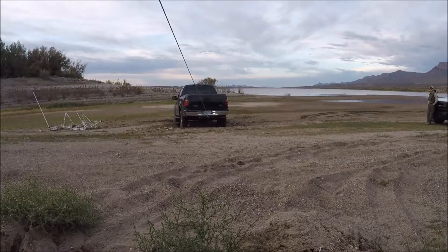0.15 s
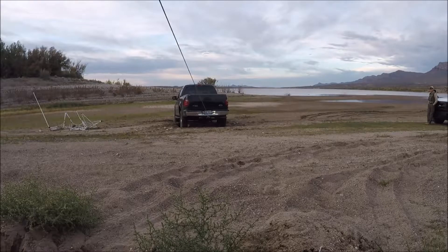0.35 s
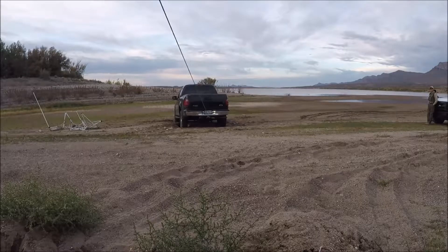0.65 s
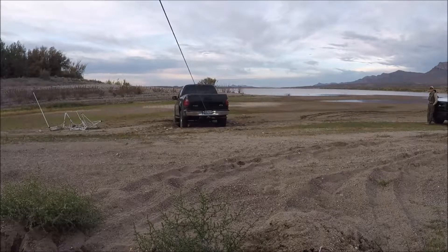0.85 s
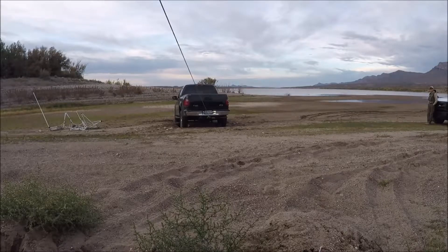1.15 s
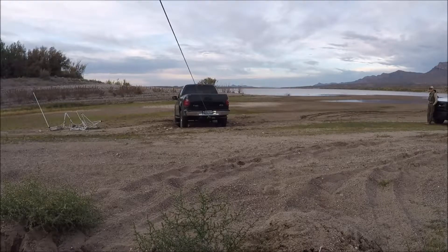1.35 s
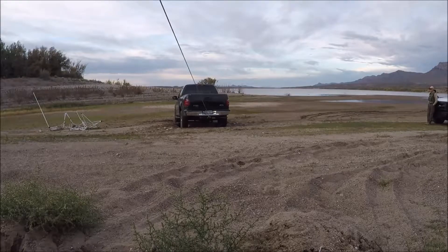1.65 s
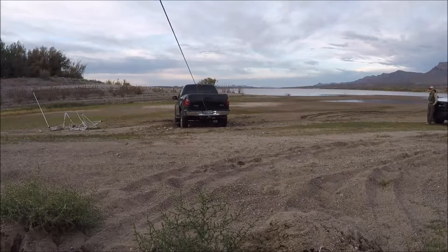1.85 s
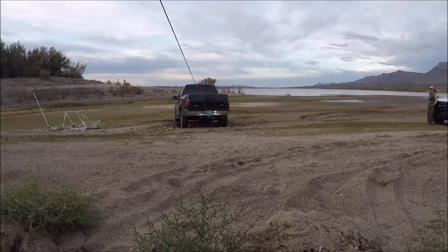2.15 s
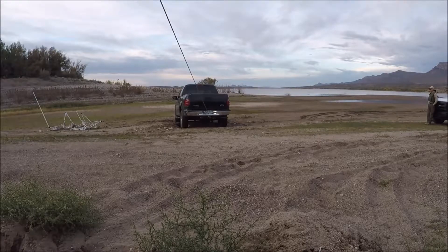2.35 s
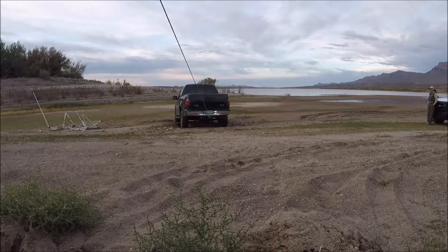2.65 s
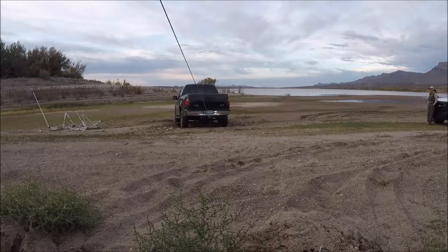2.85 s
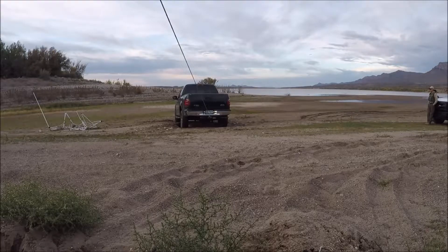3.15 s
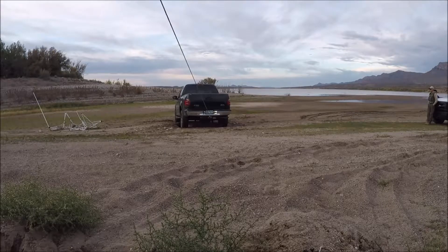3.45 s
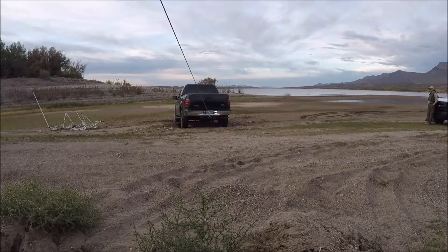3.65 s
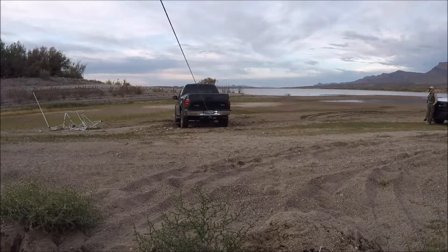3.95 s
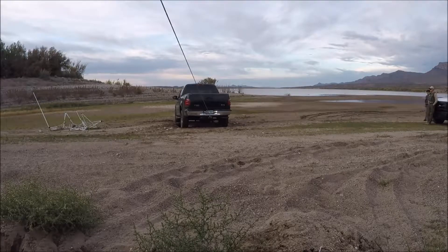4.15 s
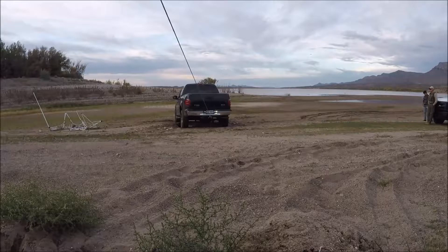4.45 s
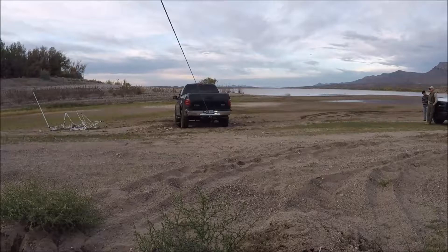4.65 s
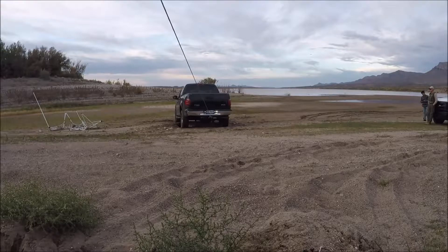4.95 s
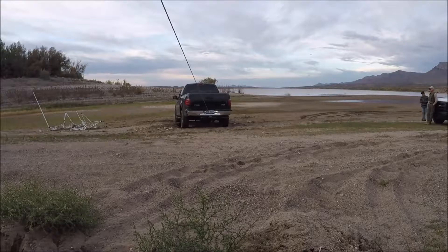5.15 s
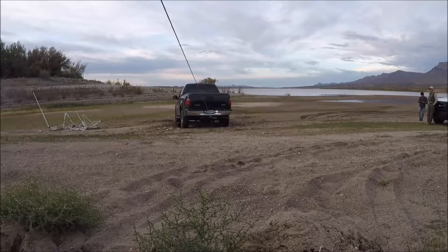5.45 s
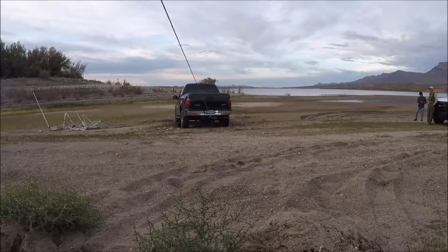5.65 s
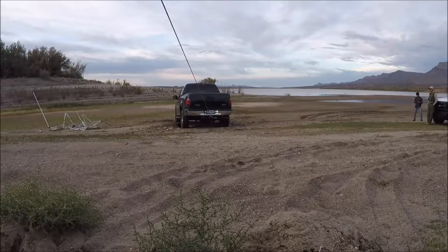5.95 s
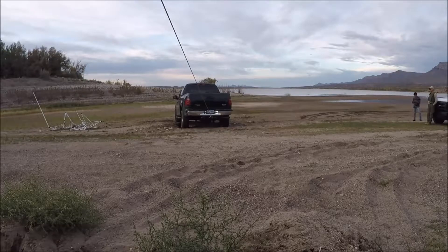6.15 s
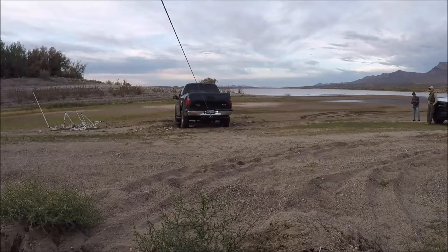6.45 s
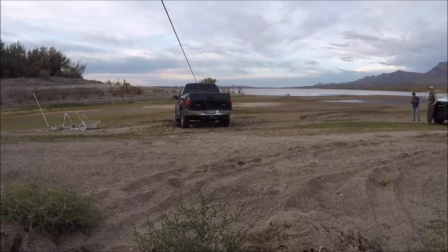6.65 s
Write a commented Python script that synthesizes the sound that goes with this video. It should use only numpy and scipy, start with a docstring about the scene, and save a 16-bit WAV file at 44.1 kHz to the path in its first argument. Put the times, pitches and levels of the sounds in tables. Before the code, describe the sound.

A hydraulic winch whines steadily at one nearly fixed pitch over a burbling truck engine, with cable ticks thinning out and a few dull drum knocks.

```python
"""A hydraulic winch whines as it hauls a stuck pickup over sand, with the towing truck's engine at a fast idle.
The engine burbles and drives a pump; the pump turns the winch motor, whose lobes whine and rasp on each turn.
The whine grows louder whenever the speed sags. Oil and air hiss, exhaust gas rumbles and a low drone wavers.
The loaded cable ticks, ever more rarely, as it settles on the drum, and a few dull knocks come from the drum."""
import sys
import numpy as np
from scipy import signal
from scipy.fft import rfft, irfft, next_fast_len
from scipy.io import wavfile
from scipy.ndimage import map_coordinates

SR = 44100
rng = np.random.default_rng(int(sys.argv[2]) if len(sys.argv) > 2 else 0)


def master_out(mix):
    """Clip the mix to full scale and print it as 16-bit PCM to the path in sys.argv[1]."""
    frames = np.transpose(np.atleast_2d(mix))
    ceiling = np.clip(frames, -1, 1)
    pcm = np.round(ceiling * 32767).astype(np.int16)
    wavfile.write(sys.argv[1], SR, pcm)


N = 300753
LOBE_PULSES_PER_TURN = 42
TURNS_PER_REV = .3341  # turns of the winch motor per engine revolution


def amp(db):
    """Turn decibels into a gain."""
    return 10 ** (np.asarray(db) / 20)


def unit(x):
    """Scale to an rms of 1."""
    return x / np.sqrt(np.mean(x ** 2) + 1e-20)


def along(points, hz):
    """Read (frequency, value) points on a logarithmic frequency axis."""
    f, v = np.transpose(points)
    return np.interp(np.log(hz + 1), np.log(f + 1), v)


def curve(rows):
    """Join (time, value) points by straight lines, one value per sample."""
    times, values = np.transpose(rows)
    return np.interp(np.arange(N) / SR, times, values)


def swell(rows):
    """A gain that follows a level curve in dB about its own mean."""
    db = curve(rows)
    return amp(db - db.mean())


def wobble(rate):
    """A smooth random curve with this many random knots a second."""
    knots = rng.standard_normal(int(N * rate / SR) + 4)
    return map_coordinates(knots, [np.arange(N) * rate / SR])


def ripples(hz, spacing_hz, knots):
    """A smooth random curve over frequency, with a knot every spacing_hz."""
    return map_coordinates(knots, [hz / spacing_hz], mode="mirror")


def filtered(x, gain):
    """Give x a gain that depends on frequency; zero padding leaves room for the filter to ring."""
    size = next_fast_len(len(x) + 8192)
    spectrum = rfft(x, size) * gain(np.fft.rfftfreq(size, 1 / SR))
    return irfft(spectrum, size)[:len(x)]


def noise(density_db):
    """Noise whose level per Hz is a function of frequency."""
    return filtered(rng.standard_normal(N), lambda hz: amp(density_db(hz)) * np.sqrt(SR / 2))


def cyclic(turn, orders, dispersion=None, size=16384):
    """A wave that repeats once a turn, from (multiple, dB rms) rows; a dispersive pipe delays the higher ones."""
    k, db = np.transpose(orders)
    if dispersion is None:
        phase = 2 * np.pi * rng.random(len(k))
    else:
        phase = -dispersion * k ** 2
    lines = np.zeros(size // 2 + 1, complex)
    lines[np.round(k).astype(int)] = amp(db) * np.exp(1j * phase)
    one_turn = irfft(lines) * size / np.sqrt(2)
    return np.interp(turn * size, np.arange(size), one_turn, period=size)


# Pitch of the whine, which tells the engine speed: (time [s], pitch [Hz])
SPEED = [(0.0, 719.6), (0.15, 718.7), (0.4, 721.0), (0.6, 720.9), (1.8, 725.6), (2.45, 723.3),
         (2.75, 719.6), (3.02, 720.7), (3.45, 724.5), (4.3, 724.7), (4.8, 722.6), (5.5, 722.5),
         (5.95, 721.1), (6.82, 723.7)]


def whine_pitch():
    """The engine drives the winch through the pump, so the pitch of the whine follows the engine speed."""
    return curve(SPEED)


# Clean lines of the winch motor: (multiple of the shaft turn, level [dB])
MOTOR_LINES = [(7, -32), (36, -34.0), (40, -45), (42, -26.4), (48, -43.2), (77, -45), (78, -30.1),
               (79, -46), (80, -46), (81, -40.5), (82, -34.9), (83, -38.2), (85, -43.5), (86, -44.9),
               (90, -36.3), (92, -46), (102, -45.3), (108, -43.9), (112, -48.4), (113, -45.0), (114, -45.2),
               (126, -36), (128, -43.9), (132, -39.5), (138, -48.4), (162, -45), (205, -46)]
# How the shaft hurries and lags within a turn: (multiple of the turn, relative level [dB])
SWAY = [(1, 0), (2, -8), (6, -20)]


def whine(turn, whine_hz, usual_db=-20, fall_db_per_hz=.7):
    """Six lobes in seven pockets give 42 pressure pulses a turn; their octave rings out, flanked by sidebands."""
    shaft = turn + .00013 * wobble(45)
    octave = np.sqrt(2) * np.sin(2 * np.pi * 2 * LOBE_PULSES_PER_TURN * shaft)
    # a lower pitch than usual means a louder whine
    level_db = usual_db - fall_db_per_hz * (whine_hz - whine_hz.mean())
    # the sidebands swell and sink within each turn
    beads = unit(amp(1.5 * unit(cyclic(turn, SWAY)) + .8 * wobble(20)))
    sidebands = beads * cyclic(shaft, MOTOR_LINES)
    return octave * amp(level_db + 0.12 * wobble(40)) + sidebands


# Fluttering overtones: (multiple of the lobe pulse rate, level before the shared swell [dB])
OVERTONES = [(4, -38.8), (5, -37.2), (6, -42.2), (7, -44.9), (8, -48.5), (9, -49.0), (10, -49.6),
             (11, -57.4), (12, -54.8), (13, -57.4)]
# Beating of the overtones: (multiple of the turn, relative level [dB])
THROB = [(1, -6), (2, 0), (3, -7), (5, -6), (6, 0), (7, -6), (8, -8)]


def overtones(turn, sway_rad=0.37, jitter_rad=0.033, beat_depth=.52, flicker=.2):
    """The shaft turns unevenly, so the higher overtones warble and beat in a pattern that slowly shifts."""
    lobe_phase = 2 * np.pi * LOBE_PULSES_PER_TURN * turn
    out = np.zeros(N)
    for k, db in OVERTONES:
        lag = sway_rad * unit(cyclic(turn, SWAY)) + jitter_rad * wobble(70)
        throb = unit(cyclic(turn + .03 * wobble(0.99), THROB))
        beat = 1 + beat_depth * throb + flicker * wobble(40)
        out += amp(db) * unit(beat * np.sin(round(k) * (lobe_phase + lag)))
    return out


# Tone colour of the rubbing: (frequency [Hz], level per Hz before the trim [dB])
RASP = [(400, -67.5), (600, -77), (850, -75), (1000, -62), (1250, -70.5), (1550, -75), (1800, -69.5),
        (2100, -67.5), (2500, -67), (2750, -88.5), (3400, -72.5), (4500, -86), (6300, -94.5),
        (7200, -100.7)]
# Uneven pressure round the shaft: (multiple of the turn, relative level [dB])
UNEVEN = [(1, -9), (2, 0), (3, -8), (5, -5), (6, 0), (7, -5), (8, -4), (12, -4)]


def rasp(turn, trim_db=-1, flutter_db=1.2):
    """The same rough spots rub on every turn, harder where the pressure is high."""
    turn_hz = turn[-1] * SR / N
    k = np.arange(LOBE_PULSES_PER_TURN, 1000)
    # each line carries the noise power of a band one turn rate wide
    line_db = along(RASP, k * turn_hz) + 10 * np.log10(turn_hz)
    rub = cyclic(turn, np.column_stack([k, line_db]))
    pressure = unit(amp(flutter_db * unit(cyclic(turn, UNEVEN)) + 0.41 * wobble(14)))
    return amp(trim_db) * rub * pressure


# Tone colour of oil flow and fan air: (frequency [Hz], level per Hz before ripple and low cut [dB])
HISS = [(600, -60), (700, -55), (800, -62), (1200, -67.5), (2400, -72), (2800, -74.5), (3700, -78.5),
        (5000, -84), (6400, -82), (7200, -94.5), (8700, -92), (11500, -104.9), (13400, -108.0),
        (14800, -116.0)]


def hiss(turn, pulse_db=0.64, ripple_db=2, low_hz=520):
    """Oil and air rush through many small resonances of the metal and pulse with the shaft."""
    knots = rng.standard_normal(SR // 100)

    def density_db(hz):
        low_cut_db = 10 * np.log10(1 + (low_hz / (hz + 1)) ** 6)
        return along(HISS, hz) + ripple_db * ripples(hz, 70, knots) - low_cut_db

    pulse = unit(amp(pulse_db * unit(cyclic(turn, UNEVEN)) + 0.74 * wobble(2.4)))
    return noise(density_db) * pulse


# Rise and fall of the rushing sound, heard only as changes about the mean: (time [s], level [dB])
RUSH = [(0.1, -30), (1.07, -31), (1.66, -29.5), (2.76, -32), (3.57, -30), (4.64, -33), (5.54, -30.5),
        (5.98, -32.5), (6.7, -30)]


def rush_swell():
    """The overtones, rasp and hiss grow and fade together."""
    return swell(RUSH)


# Exhaust notes: (multiple of the two-revolution firing cycle, level before the trim [dB])
EXHAUST = [(2, -37.5), (3, -38.7), (4, -28.8), (5, -26.0), (6, -15.2), (7, -35.0), (8, -18.0), (9, -38.8),
           (10, -31.1), (11, -30.9), (12, -31.6), (13, -37.2), (14, -31.7), (15, -40.4), (16, -36.5),
           (17, -35.9), (18, -37.4), (19, -45.1), (20, -44.4), (21, -42.6), (22, -38.3), (23, -44),
           (24, -42.5), (25, -45)]


def exhaust(rev, trim_db=-.5, unsteady_db=0.7):
    """Firing pulses repeat every two revolutions and smear in the pipe."""
    firing = cyclic(rev / 2, EXHAUST, dispersion=.54)
    return firing * amp(trim_db + surges() + unsteady_db * wobble(15))


# Tone colour of the turbulent exhaust gas: (frequency [Hz], level per Hz before the trim [dB])
RUMBLE = [(15, -56.5), (30, -51), (70, -43.5), (110, -54), (165, -45.5), (210, -53), (270, -54.5),
          (400, -61.5), (500, -59.5), (800, -79), (1500, -110)]


def gas_rumble(rev, puff_db=2.0, trim_db=-1):
    """Turbulent exhaust gas rumbles in puffs, one each engine revolution."""
    puffs = unit(amp(puff_db * np.sin(2 * np.pi * rev) + 0.35 * wobble(3.2)))
    return amp(trim_db) * noise(lambda hz: along(RUMBLE, hz)) * puffs


def drone(rev, level_db=-29.5, waver_db=3, per_rev=6.6, drift=.12):
    """A low drone wavers above the strongest firing notes, perhaps the engine fan; drift is in cycles."""
    tone = np.sin(2 * np.pi * (per_rev * rev + drift * wobble(9)))
    return amp(level_db) * unit(amp(waver_db * wobble(6)) * tone)


# Rise and fall of the gas rumble, heard only as changes about the mean: (time [s], level [dB])
GAS = [(0.0, -21.5), (1.0, -24.0), (1.8, -20.0), (2.95, -23.5), (3.35, -20.5), (4.9, -26.5), (5.3, -24),
       (5.95, -26), (6.82, -22)]


def gas_swell():
    """The gas rumble and the drone grow and fade together."""
    return swell(GAS)


def pump(rev, hum_db=-28.0, per_rev=12.907):
    """The belt-driven pump hums at a fixed multiple of the engine speed."""
    hum = np.sqrt(2) * np.sin(2 * np.pi * per_rev * rev)
    return amp(hum_db + 0.87 * wobble(4)) * hum


def faint_ticks(bright_db, count=16, first_per_s=10, settle_s=.7, level_db=-32, spread_db=1):
    """Faint ticks thin out as the cable settles: their rate falls to 1/e in settle_s; levels precede the trim."""
    share = (np.arange(count) + rng.random(count)) / (first_per_s * settle_s)
    levels = level_db + spread_db * rng.standard_normal(count)
    last_share = 1 - np.exp(-N / SR / settle_s)
    return [(-settle_s * np.log(1 - u), db, bright_db) for u, db in zip(share, levels) if u < last_share]


# Loud cable ticks: (time [s], level before the trim [dB], top octave against the whole [dB])
TICKS = [(0.0144, -28, -24), (0.0837, -25, -30), (0.195, -23, -27), (0.2478, -27, -28), (0.3401, -26, -27),
         (0.4299, -32, -28), (0.5342, -31, -24), (0.6764, -30, -27), (0.7507, -25, -35), (1.2052, -27, -26),
         (2.153, -30, -34), (2.4674, -31, -22), (3.4087, -28, -31), (3.5359, -26, -34), (3.8746, -25, -34),
         (4.6818, -24, -33)]
# Tone colour of a tick: (frequency [Hz], relative level [dB])
TICK_COLOUR = [(500, -12.5), (2000, -1), (4200, 6), (6200, 1), (7300, -10.5), (8800, -6.5), (11000, -21),
               (14500, -19)]


def cable_ticks(trim_db=-5, t60=0.055):
    """Wraps of cable snap into place, each with its own ring that falls by 60 dB in t60 seconds."""
    out, t = np.zeros(N + SR), np.arange(SR // 4) / SR
    usual_db = np.mean([row[2] for row in TICKS])
    for s, db, bright_db in list(TICKS) + faint_ticks(usual_db):
        knots = rng.standard_normal(64)
        # brighter or duller than usual towards the top
        tilt = [(6000, 0.002), (12000, bright_db - usual_db)]

        def colour(hz):
            return amp(along(TICK_COLOUR, hz) + along(tilt, hz) + 2.5 * ripples(hz, 450, knots))

        snap = unit(filtered(rng.standard_normal(len(t)), colour))
        out[round(s * SR):][:len(t)] += amp(db + trim_db - 60 * t / t60) * snap
    return out[:N]


# Dull knocks of the drum: (time [s], level before the fade [dB])
KNOCKS = [(.335, -27), (3.53, -19.5), (4.686, -24.5)]


def drum_knocks(knock_hz=545, width_hz=95, t60=0.17, rise_s=.004):
    """The biggest shifts of the cable knock the drum, which rings dully round one pitch."""
    out, t = np.zeros(N + SR), np.arange(SR // 4) / SR
    for s, db in KNOCKS:
        hit = rng.standard_normal(len(t))
        ring = unit(filtered(hit, lambda hz: 1 / (1 + ((hz - knock_hz) / width_hz) ** 2)))
        out[round(s * SR):][:len(t)] += amp(db - 60 * t / t60) * (1 - np.exp(-t / rise_s)) * ring
    return out[:N]


# Moments of harder throbbing: (time of mid-rise [s], length to mid-fall [s], boost [dB])
SURGES = [(1.9, 0.21, 2.5), (3.95, 0.79, 1), (5.502, .5, 1)]


def surges(ramp_s=.2):
    """The exhaust throbs harder for a moment: its boost in dB rises, holds and falls back."""
    t = np.arange(N) / SR
    boost = np.zeros(N)
    for s, length, db in SURGES:
        inside = np.minimum(t - s, s + length - t)
        boost += db * np.clip(inside / ramp_s + .5, 0, 1)
    return boost


def scene():
    """The engine speed sets the pace of the pump and of the winch, and the strength of the whine."""
    whine_hz = whine_pitch()
    turn = np.cumsum(whine_hz) / SR / (2 * LOBE_PULSES_PER_TURN)
    rev = turn / TURNS_PER_REV
    winch = whine(turn, whine_hz) + rush_swell() * (overtones(turn) + rasp(turn) + hiss(turn))
    truck = exhaust(rev) + gas_swell() * (gas_rumble(rev) + drone(rev)) + pump(rev)
    return (truck + winch + cable_ticks() + drum_knocks())[None]


def record(dry, ceiling=.93, top_hz=15000):
    """The highest peaks are rounded off, the ends eased, and nothing is kept above top_hz."""
    held = dry[0] / (1 + np.abs(dry[0] / ceiling) ** 10) ** (1 / 10)
    ease = signal.windows.tukey(N, .001)
    return filtered(held * ease, lambda hz: hz < top_hz)[None]


dry = scene()
out = record(dry)
master_out(out)
```